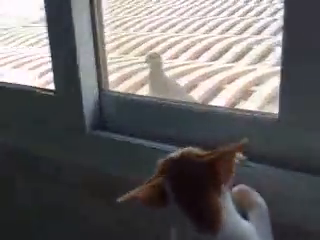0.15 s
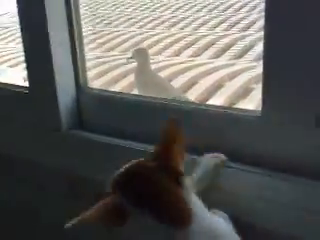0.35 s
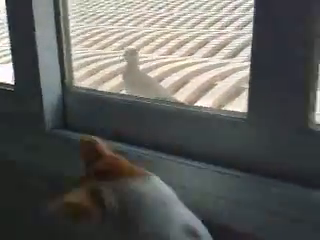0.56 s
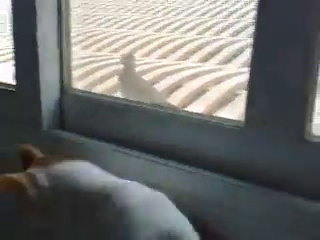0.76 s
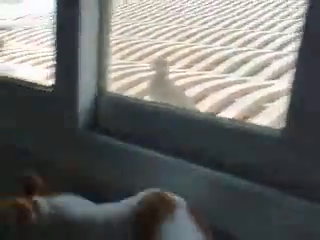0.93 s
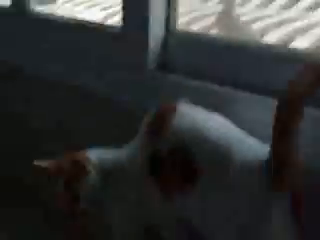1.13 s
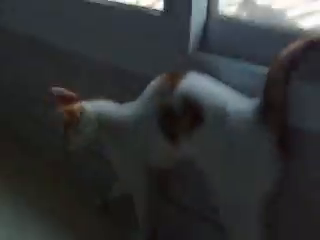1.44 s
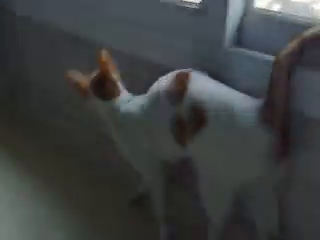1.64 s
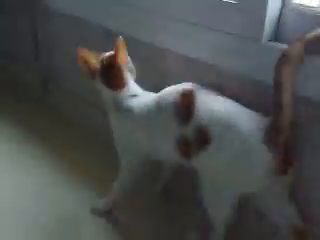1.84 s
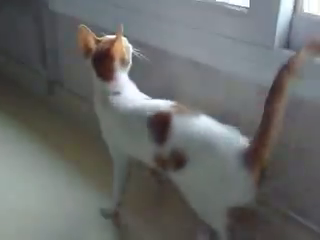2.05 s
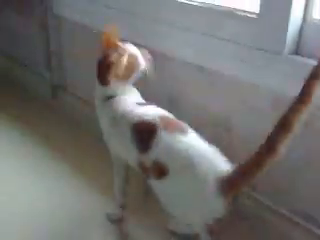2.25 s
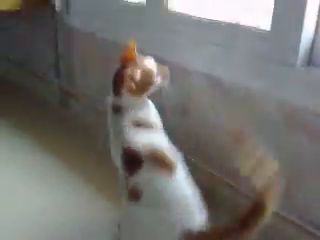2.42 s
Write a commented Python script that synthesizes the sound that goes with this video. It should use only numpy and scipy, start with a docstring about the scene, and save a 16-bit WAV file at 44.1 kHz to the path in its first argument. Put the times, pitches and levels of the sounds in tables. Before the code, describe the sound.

Single cat meow, raspy then clear and falling, with quiet motor hum and faint handling bumps

```python
"""A cat gives one meow in a bare, hard-walled room: a closed-mouth "m", an opening "ee-a" at the top
of the pitch arch, and a falling "ow". The voice is a sum of vocal fold harmonics shaped by the mouth,
plus a noise rasp. Motor and mains hum lie under it, made of sines, with a buzz, chatter and a thin whine.
Coloured noise makes the low rumble and faint hiss, and, in short swells, the soft scuffs
and faint bumps of movement near the microphone."""
import sys
import numpy as np
from scipy import signal
from scipy.fft import rfft, irfft
from scipy.io import wavfile

SR = 44100
rng = np.random.default_rng(int(sys.argv[2]) if len(sys.argv) > 2 else 0)


def unload_audio(sound):
    """Save the sound as a 16-bit wav file, at the path given as the first command line argument."""
    columns = np.transpose(np.atleast_2d(sound))
    # keep every value between -1 and 1, then stretch to whole-number steps
    steps = np.round(np.clip(columns, -1, 1) * 32767)
    wavfile.write(sys.argv[1], SR, steps.astype(np.int16))


N = 113778
T = np.arange(N) / SR


def undb(db):
    """Decibels to amplitude gain."""
    return 10 ** (np.asarray(db) / 20)


def curve(rows):
    """Join (s, value) points with straight lines."""
    return np.interp(T, *np.array(rows).T)


def noise(shape):
    """Unit-RMS noise whose spectrum is weighted by a function of frequency."""
    hz = np.arange(N // 2 + 1) * SR / N + 1e-6
    x = irfft(rfft(rng.standard_normal(N)) * shape(hz), N)
    return x / x.std()


def coloured(points):
    """Unit-RMS noise with a (Hz, dB) spectrum, joined over log frequency."""
    hz, db = np.array(points).T
    return noise(lambda f: undb(np.interp(np.log(f), np.log(hz), db)))


def band(centre_hz, width_hz):
    """Unit-RMS noise in a resonance-like band."""
    return noise(lambda f: 1 / (1 + ((f - centre_hz) / width_hz) ** 2))


def walk(rate_hz):
    """Smooth chance with unit spread, changing about rate_hz times a second."""
    return noise(lambda f: (f > 1e-3) / (1 + (f / rate_hz) ** 4))


def swell(at_s, attack_s, decay_s):
    """Envelope with a Gaussian rise to its peak and an exponential decay."""
    rise = (np.minimum(T - at_s, 0) / attack_s) ** 2
    fall = np.maximum(T - at_s, 0) / decay_s
    return np.exp(-rise - fall)


def sputter(depth_db, rate_hz):
    """Random, grainy gain with unit power."""
    gain = undb(depth_db * walk(rate_hz))
    return gain / np.sqrt(np.mean(gain ** 2))


# Low room noise spectrum. Each row: frequency in Hz, relative density in dB per Hz.
RUMBLE_COLOUR = [(20, -4.5), (45, -4), (75, 1.5), (130, 2.5), (160, -3.5), (190, 2.5), (250, -8), (380, -5),
                 (520, -10.5), (700, -11), (1100, -16), (1700, -25), (2600, -26.5), (3600, -32),
                 (5200, -32.5), (7000, -48)]
# Treble hiss spectrum. Each row: frequency in Hz, relative density in dB per Hz.
HISS_COLOUR = [(1000, 1.5), (2400, -4.5), (3600, -2.5), (5200, -2), (7000, -9)]
# Treble hiss level. Each row: time in seconds, level in dB.
HISS_LEVEL = [(0, -64), (.45, -76), (1.4, -70), (2.05, -69), (2.3, -74), (2.58, -95)]
RUMBLE_DB = -49.5


def rumble():
    """Steady low room noise under a faint hiss of changing level, both filtered noise."""
    low = undb(RUMBLE_DB) * coloured(RUMBLE_COLOUR)
    hiss = undb(curve(HISS_LEVEL)) * coloured(HISS_COLOUR)
    return low + hiss


# Hum tones: motor, and mains hum at 120 Hz. Each row: frequency in Hz, mean RMS level in dB.
HUM = [(58.8, -51.5), (117.5, -64), (120, -51.5), (204.6, -58)]
# Buzz locked to the motor's turns. Each row: multiple of the turning rate, RMS level in dB.
BUZZ = [(5, -58), (6, -51.5), (7, -56), (8, -63)]
# Whine noise bands. Each row: frequency in Hz, width in Hz, level in dB before the whine level curve.
WHINE_BANDS = [(2200, 150, -75), (2780, 110, -82), (4750, 150, -83.5)]
# Whine tones. Each row: frequency in Hz, RMS level in dB before the whine level curve.
WHINE_TONES = [(2118, -70.5), (2159, -78), (2821, -76)]
# Level curve of the whole whine. Each row: time in seconds, gain in dB.
WHINE_LEVEL = [(0, 7), (.5, 0.5), (1.3, 1.5), (2.58, -4)]
MOTOR_HZ = 58.78
HUM_WAVER_DB, HUM_DRIFT_SHARE = -0.2, 0.0013  # random spread of level and frequency
CHATTER_DB, CHATTER_HZ, CHATTER_WIDTH_HZ = -61, 330, 76  # level before the turn pulse


def motor_and_mains():
    """Wavering hum, buzz on multiples of the turn, chatter pulsing once a turn, thin whine; tones drift together."""
    clock_s = np.cumsum(1 + HUM_DRIFT_SHARE * walk(rate_hz=0.51)) / SR
    turn = 2 * np.pi * MOTOR_HZ * clock_s

    hum = 0
    for hz, db in HUM:
        tone = np.sin(2 * np.pi * (hz * clock_s + rng.random()))
        hum = hum + undb(db + HUM_WAVER_DB * walk(rate_hz=13)) * tone
    buzz = sum(undb(db) * np.cos(multiple * turn) for multiple, db in BUZZ)

    turn_pulse = np.cos(turn / 2) ** 2
    chatter = undb(CHATTER_DB) * band(CHATTER_HZ, CHATTER_WIDTH_HZ) * turn_pulse

    whine_noise = sum(undb(db) * band(hz, width_hz) for hz, width_hz, db in WHINE_BANDS)
    whine_tones = sum(undb(db) * np.sin(2 * np.pi * hz * clock_s) for hz, db in WHINE_TONES)
    whine = (whine_noise + np.sqrt(2) * whine_tones) * undb(curve(WHINE_LEVEL))
    return np.sqrt(2) * (hum + buzz) + chatter + whine  # sqrt(2): sine of unit RMS


# Soft scuffs. Each row: peak time in seconds, level in dB, attack in seconds, decay in seconds.
SCUFFS = [(1.257, -57, 0.0043, 0.028), (1.499, -82, 0.0042, 0.015), (1.878, -57.5, 0.013, 0.075),
          (1.906, -56.5, .006, 0.021), (1.932, -61, 0.0045, 0.12)]
# Scuff spectrum. Each row: frequency in Hz, relative density in dB per Hz.
SCUFF_COLOUR = [(400, -19.5), (1200, 4), (1800, -2), (2400, 11), (3200, -2), (4500, -7.5), (7000, -29.5)]
# Handling bumps. Each row: peak time in seconds, level in dB.
BUMPS = [(.155, -66), (.92, -58), (1.086, -45), (1.37, -41), (1.49, -39.5), (1.938, -51), (2.46, -48.5)]
# Bump spectrum. Each row: frequency in Hz, relative density in dB per Hz.
BUMP_COLOUR = [(25, -16), (60, 12), (120, -9.5), (250, -4), (700, -42), (3000, -59.5)]
BUMP_ATTACK_S, BUMP_DECAY_S = 0.022, 0.0094
SCUFF_GRAIN_DB = 1.5  # spread of the sputter


def movement():
    """Soft, sputtering scuffs and dull handling bumps: noise under short swells."""
    scuffs = sum(undb(db) * swell(at_s, attack_s, decay_s) for at_s, db, attack_s, decay_s in SCUFFS)
    bumps = sum(undb(db) * swell(at_s, BUMP_ATTACK_S, BUMP_DECAY_S) for at_s, db in BUMPS)
    grain = sputter(depth_db=SCUFF_GRAIN_DB, rate_hz=100)
    return scuffs * coloured(SCUFF_COLOUR) * grain + bumps * coloured(BUMP_COLOUR)


# What the walls give back. Each row: frequency in Hz, relative response in dB.
ROOM_COLOUR = [(400, -10), (650, -4), (1000, -2.5), (1650, -2.5), (2100, -3), (2500, 1.5), (3200, -2.5),
               (6000, -2.5)]
ROOM_DB, ROOM_GAP_S = -5, 0.0066  # tail energy, silence before the tail
ROOM_T60_S, ROOM_TREBLE_T60_S = .65, .55


def fade(t60_s):
    """Exponential decay that falls 60 dB in t60_s."""
    return np.exp(-np.log(1000) * T / t60_s)


def room(x):
    """Direct sound plus a dense noise tail from the bare walls; the treble dies sooner."""
    echoes = coloured(ROOM_COLOUR)
    low = signal.sosfiltfilt(signal.butter(4, 3200, fs=SR, output="sos"), echoes)
    treble = echoes - low
    tail = low * fade(ROOM_T60_S) + treble * fade(ROOM_TREBLE_T60_S)
    tail = tail * (T > ROOM_GAP_S)
    tail = tail / np.linalg.norm(tail)
    return x + undb(ROOM_DB) * signal.fftconvolve(x, tail)[:N]


# Unevenness of the folds. Each row: time in seconds, roughness 0-1.
ROUGH = [(.48, .15), (.565, .2), (.585, 1), (.65, .9), (.715, .6), (.75, .12), (.87, .08), (.92, .3),
         (1.0, .35)]
# Vocal fold rate. Each row: time in seconds, pitch in Hz before jitter.
PITCH = [(.478, 645), (.505, 598), (.527, 650), (.547, 688), (.575, 678), (.597, 668), (.622, 692),
         (.65, 735), (.70, 795), (.76, 823), (.80, 831), (.85, 829), (.895, 800), (.925, 757), (.955, 730),
         (.98, 683), (1.03, 613), (1.05, 597), (1.07, 603)]
# Progress of the mouth. Each row: time in seconds, shape
# (0 closed "m", 1 parting "ee", 2 wide "a", 3 rounded "ow", 4 nearly shut).
MOUTH = [(.48, 0), (.562, .03), (.573, 1), (.622, 1), (.655, 1.45), (.73, 1.62), (.77, 2), (.83, 2.05),
         (.875, 2.5), (.915, 2.85), (.95, 3), (1.02, 3.05), (1.06, 4)]
# Throat and mouth response. Each row: frequency in Hz, then gain in dB for
# the shapes closed, parting, wide, rounded, nearly shut.
THROAT = [(636, 0, 8, -5, -2, -2), (871, 3, -10, -22, 3, -6), (1377, -26, -8.5, 2, -19, -32),
          (1542, -28.5, 0, -0.5, -9, -33), (1977, -27, -5.5, 0, -5, -25.5), (2080, -27, 2, 6, -20.5, -36.5),
          (2493, -33.5, -22, -1, -2.5, -49.5), (2545, -34.5, -11.5, -6, -22, -34),
          (3310, -61.5, -23, -22, -35.5, -29), (4150, -52.5, -17, -17.5, -36, -42.5),
          (4950, -53, -43.5, -12.5, -39, -48), (5670, -69.5, -33.5, -30, -42, -72),
          (7900, -71, -89, -38, -61.5, -75)]
# Level of the voice, with the room's ringing on its lowest harmonic near 0.98 s.
# Each row: time in seconds, level in dB before throat response and shimmer.
VOICE_LEVEL = [(.474, -79), (.483, -38), (.495, -38), (.512, -52.5), (.519, -44), (.527, -34.5),
               (.575, -42), (.62, -44), (.69, -40), (.735, -38.5), (.77, -37), (.875, -35), (.93, -39.5),
               (.962, -35), (.98, -28.5), (1.005, -39.5), (1.068, -30.5), (1.083, -57.5)]
# Rasp spectrum. Each row: frequency in Hz, relative density in dB per Hz.
RASP_COLOUR = [(600, -4), (1300, 9.5), (2100, -7), (3200, -9.5), (4100, 8.5), (5000, -1.5), (5900, 5),
               (7000, -33)]
JITTER_SHARE, JITTER_RATE_HZ = .018, 200  # spread of pitch at full roughness
SHIMMER_DB, GLOTTAL_AIR_DB = 2, -20.5  # at full roughness
RASP_S, RASP_ATTACK_S, RASP_DECAY_S = 0.593, 0.012, 0.09  # air hisses as the mouth opens
RASP_DB, RASP_GRAIN_DB = -53.5, -1  # peak level before the fold pulse, spread of the sputter


def meow():
    """Fold harmonics shaped by the mouth: rough and raspy as it opens, clean at the top of the arch."""
    pitch_hz, rough = curve(PITCH), curve(ROUGH)
    jitter = 1 + JITTER_SHARE * rough * walk(JITTER_RATE_HZ)
    phase = 2 * np.pi * np.cumsum(pitch_hz * jitter) / SR

    hz, *shapes = np.array(THROAT).T
    mouth = np.clip(curve(MOUTH), 0, len(shapes) - 1)
    shares = [np.maximum(1 - abs(mouth - k), 0) for k in range(len(shapes))]  # crossfade of shapes

    voice = 0
    for k in range(1, 12):
        log_hz = np.log(k * pitch_hz)
        db = sum(share * np.interp(log_hz, np.log(hz), shape) for share, shape in zip(shares, shapes))
        air = undb(GLOTTAL_AIR_DB) * rough * walk(rate_hz=760)
        voice = voice + undb(db) * np.sin(k * phase) * (1 + air)
    shimmer_db = SHIMMER_DB * rough * walk(rate_hz=100)
    voice = np.sqrt(2) * voice * undb(curve(VOICE_LEVEL) + shimmer_db)

    fold_pulse = 1 + .5 * np.cos(phase)
    rasp = undb(RASP_DB) * swell(RASP_S, RASP_ATTACK_S, RASP_DECAY_S) * coloured(RASP_COLOUR)
    rasp = rasp * fold_pulse * sputter(depth_db=RASP_GRAIN_DB, rate_hz=120)

    sounding = (T > VOICE_LEVEL[0][0]) & (T < VOICE_LEVEL[-1][0])
    return sounding * (voice + rasp)


def scene():
    """Rumble, hum and movement under the cat in its room."""
    return (rumble() + motor_and_mains() + movement() + room(meow()))[None]


TOP_HZ = 7450


def record(dry):
    """A steep low-pass: almost nothing is heard above TOP_HZ."""
    low_pass = signal.ellip(10, .2, 80, TOP_HZ, fs=SR, output="sos")  # ripple, stopband in dB
    return signal.sosfilt(low_pass, dry)


dry = scene()
out = record(dry)
unload_audio(out)
```